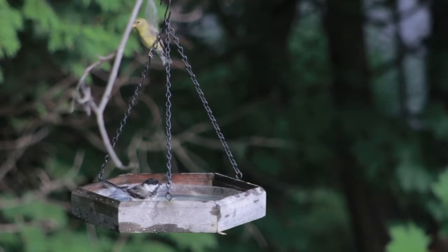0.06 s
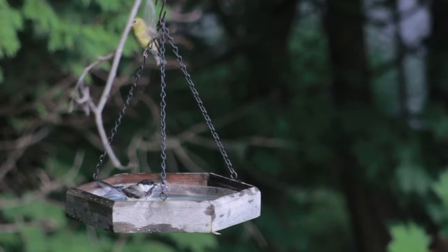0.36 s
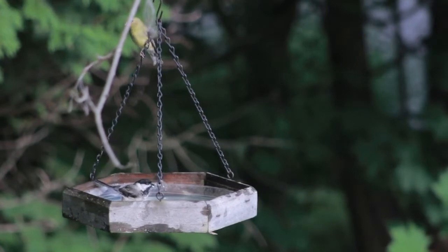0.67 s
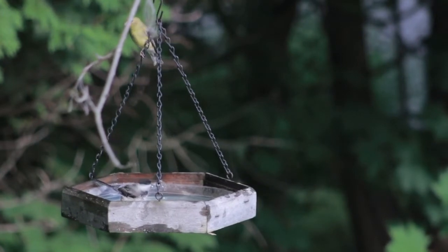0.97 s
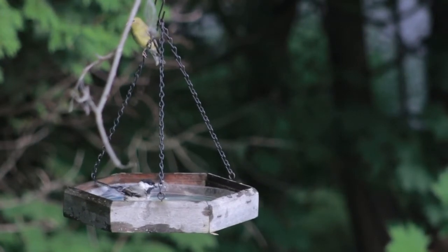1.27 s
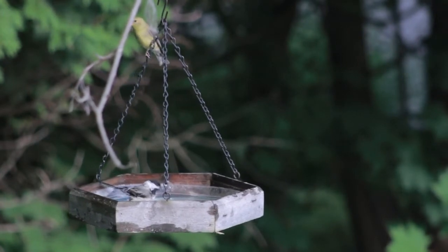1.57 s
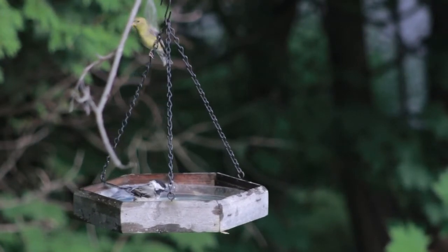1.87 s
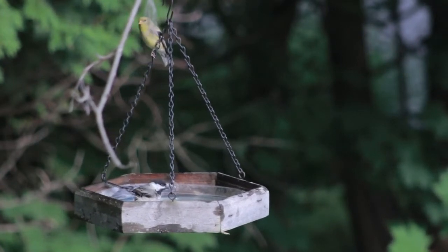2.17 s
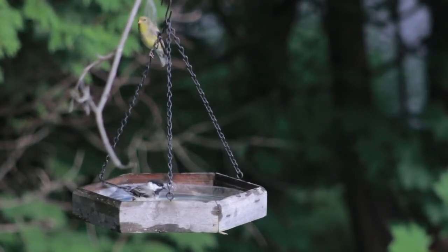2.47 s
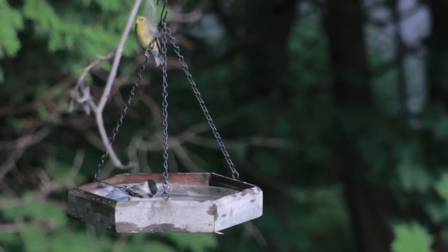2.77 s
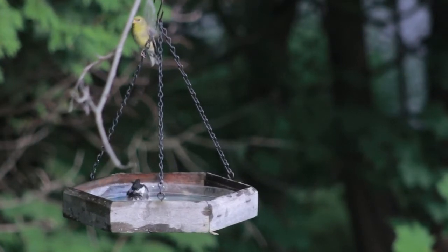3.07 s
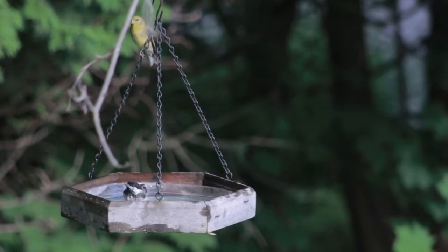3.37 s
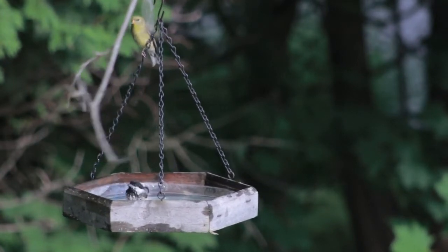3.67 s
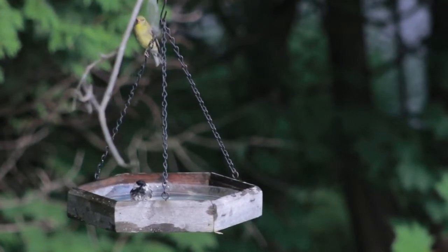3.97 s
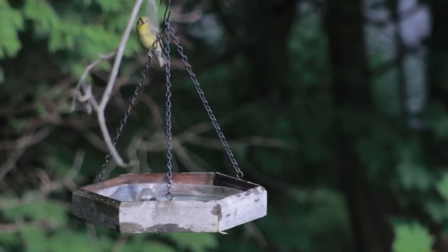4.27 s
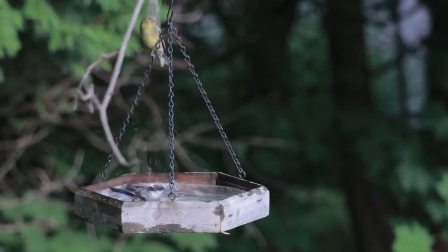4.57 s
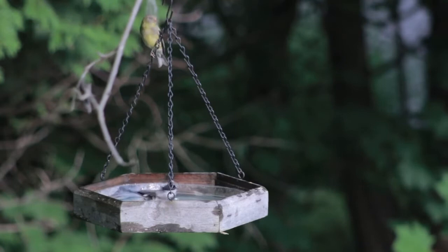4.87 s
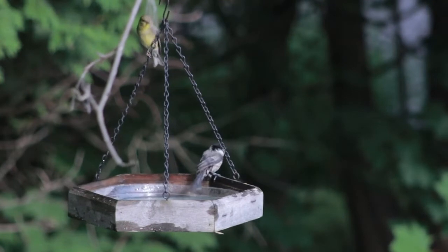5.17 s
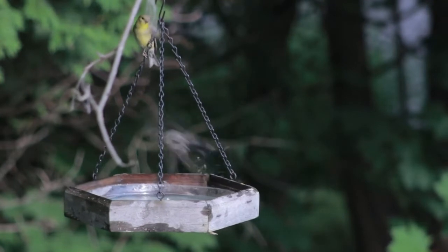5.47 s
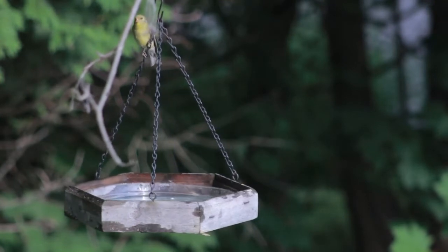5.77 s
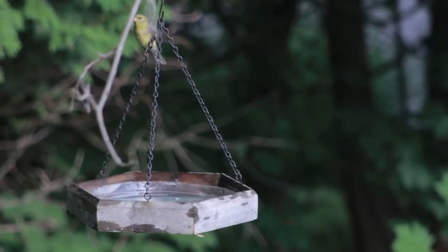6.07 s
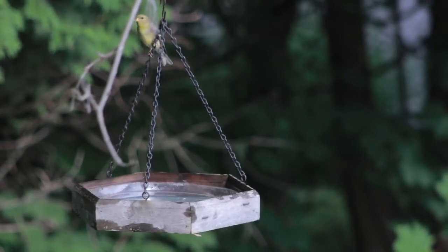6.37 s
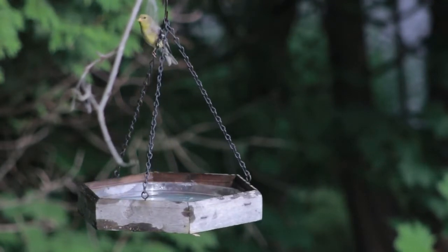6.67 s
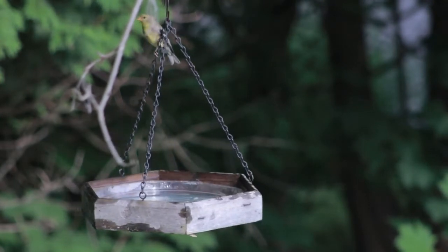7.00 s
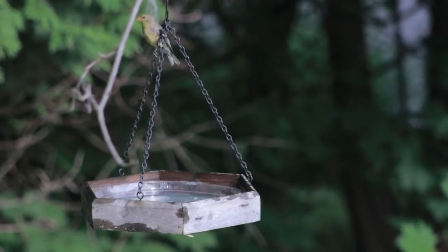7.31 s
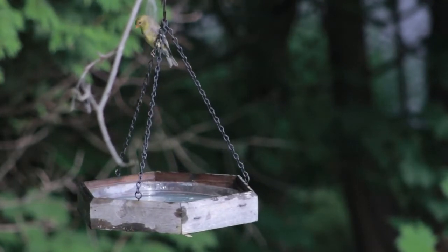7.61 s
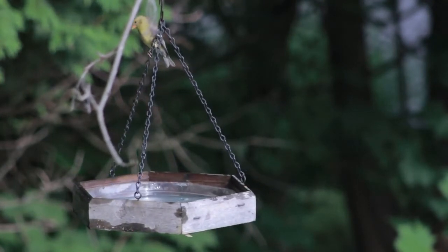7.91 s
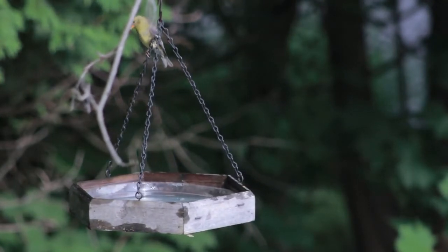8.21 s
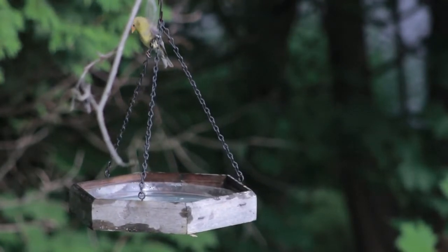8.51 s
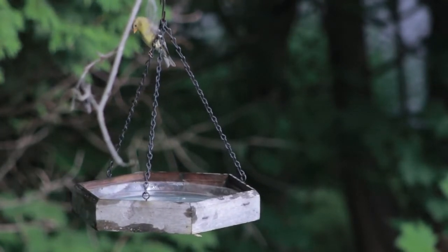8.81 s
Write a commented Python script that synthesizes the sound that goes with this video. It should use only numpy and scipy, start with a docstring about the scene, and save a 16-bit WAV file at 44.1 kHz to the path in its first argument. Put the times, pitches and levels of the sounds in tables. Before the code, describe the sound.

In a quiet wooded garden, quick clusters of slightly hoarse bird chirps come from the trees, with short pauses between them. A second small bird, nearer the microphone, slips in a few very high calls, while a cricket pulses softly all the way through. Underneath lie an even hiss and the low drone of far engines, rising briefly around the middle, with another engine faintly approaching at the end.

```python
"""Songbirds, cricket and a far road.

A songbird's syrinx whistles short slurred phrases from the trees round a bird bath, about one a second;
a small bird nearer by gives thin high calls. A cricket chirps steadily, rasping its wings.
Trunks and leaves scatter every note. Far behind the wood, two exhausts drone over tyre noise and hiss."""
import sys
import numpy as np
from scipy import signal
from scipy.fft import rfft, irfft
from scipy.io import wavfile

SR = 44100
rng = np.random.default_rng(int(sys.argv[2]) if len(sys.argv) > 2 else 0)


def materialize(psi):
    """Save the field psi as 16-bit PCM at rate SR to the path in sys.argv[1].

    A 1-D psi becomes a single channel; in a 2-D psi each row is a channel.
    """
    bounded = np.clip(np.atleast_2d(psi).T, -1, 1)
    quanta = np.round(bounded * 32767).astype(np.int16)
    wavfile.write(sys.argv[1], SR, quanta)


N = 390285
TIME_S = np.arange(N) / SR
FREQ_HZ = np.maximum(np.arange(N // 2 + 1) * SR / N, 1)

# songbird notes: (start [s], length [s], first pitch [Hz], middle pitch [Hz], last pitch [Hz],
# relative level [dB], accent position [0-1])
SONG_NOTES = [ (.136, 0.013, 3170, 3285, 3350, -36.5, 0.9), (.156, 0.053, 3300, 3850, 4140, -48, 0.4),
              (.238, 0.031, 2850, 2706, 3830, -37, 0.6), (.274, 0.055, 3550, 2750, 2555, -34.5, 0.02),
              (.682, 0.015, 4730, 3340, 2940, -56, 0.55), (1.155, 0.057, 3500, 3060, 3850, -55.5, .55),
              (1.294, 0.047, 2510, 3127, 3240, -37, 0.82), (1.340, 0.051, 3200, 2670, 2423, -33, 0.03),
              (1.398, 0.0096, 2520, 2740, 2800, -37.5, 0.4), (2.384, 0.063, 2720, 3450, 2910, -47.5, 0.26),
              (2.424, 0.029, 2650, 2364, 2825, -40.5, 1), (2.472, 0.017, 2330, 2310, 2480, -46, .6),
              (2.560, 0.032, 3480, 2760, 2500, -39, 0.36), (2.770, 0.04, 4950, 4750, 4300, -64, 0.6),
              (2.934, 0.032, 4500, 3650, 3050, -53.5, 0.8), (3.496, 0.039, 3530, 2993, 2910, -43, 0.47),
              (3.554, 0.022, 2570, 2840, 3820, -35.5, 0.83), (4.703, 0.012, 3150, 2950, 3100, -48, .5),
              (4.718, 0.042, 3310, 3550, 3030, -48.5, 0.5), (4.784, 0.032, 2710, 3290, 3960, -39.5, 0.22),
              (5.492, 0.027, 3200, 3590, 3400, -50.5, 0.65), (5.516, 0.038, 3400, 2390, 2420, -41, 0.07),
              (5.636, 0.046, 2590, 2747, 2690, -34.5, 0.67), (5.688, 0.038, 2700, 2695, 2600, -36.5, 0.5),
              (6.545, .050, 4900, 4230, 3640, -62, 0.95), (6.602, 0.044, 3050, 2720, 2880, -51.5, 0.02),
              (6.650, 0.038, 2890, 3630, 4530, -50.5, 0.33), (7.362, 0.047, 2670, 2710, 2920, -51, 0.4),
              (7.390, 0.0272, 3064, 2980, 2580, -35.5, 0.67), (7.420, 0.026, 2840, 2735, 2630, -34.5, 0.4),
              (7.444, 0.0617, 2680, 2444, 2403, -37, 0.06), (7.588, 0.0367, 2900, 2894, 2380, -46.5, 0.3),
              (7.638, 0.021, 2380, 2370, 2320, -49, 0.61), (8.400, 0.023, 5200, 4820, 4150, -47, 0.6),
              (8.424, 0.025, 4110, 3710, 3700, -50, 0.56), (8.465, 0.021, 2890, 2615, 2500, -54, 0.4),
              (8.506, 0.029, 2550, 2770, 3400, -47, 0.74), (8.545, 0.031, 4500, 3494, 2700, -37.5, 0.73), ]
# share of the song sent into the trees as the head turns: (time [s], gain [dB])
HEAD_TURN = [(.2, 0.5), (1.35, -0.5), (2.5, 0.5), (3.55, 3.5), (4.75, 3), (5.51, 8.5), (5.55, 1),
             (5.65, -0.5), (5.72, -12.5), (6.6, 4.5), (7.45, -3), (8.5, -1)]
# small bird's calls: columns as SONG_NOTES
CALL_NOTES = [ (3.551, .048, 5500, 5910, 3550, -36, 0.34), (4.721, 0.048, 6770, 7650, 7880, -34, 0.22),
              (6.058, 0.027, 6900, 7140, 7240, -42, .43), (6.262, 0.037, 6800, 7250, 7940, -33, 0.67),
              (6.289, .024, 7610, 7680, 6250, -34.5, 0.31), (7.075, 0.022, 7760, 7800, 6300, -61, .3),
              (7.530, 0.03, 7200, 7560, 8000, -52, .42), ]
# cricket chirps: (peak time [s], relative level [dB])
CRICKET_CHIRPS = [(.28, -52), (.66, -60), (1.03, -59.5), (1.33, -56), (1.65, -57.5), (1.91, -56.5),
                  (2.19, -56), (2.48, -52.5), (2.97, -55), (3.25, -58), (3.54, -52), (3.82, -54),
                  (4.08, -55), (4.36, -60), (4.61, -57), (4.86, -56.5), (5.14, -58.5), (5.41, -57),
                  (5.68, -58.5), (5.98, -63.5), (6.28, -58.5), (6.53, -61.5), (6.83, -58.5), (7.11, -63),
                  (7.42, -63.5), (7.69, -62), (7.92, -58), (8.18, -61.5), (8.49, -57), (8.78, -64)]
# far exhaust: (time [s], level [dB])
EXHAUST_LEVEL = [(0.0, -47.5), (0.29, -56.5), (0.39, -50), (0.67, -63), (0.71, -49.5), (1.01, -71),
                 (1.06, -56.5), (2.29, -75), (2.69, -55), (2.96, -69), (3.52, -44), (4.46, -47.5),
                 (4.68, -64.5), (6.16, -69.5), (7.22, -52.5), (7.64, -70.5), (7.84, -60.5), (8.85, -62.5)]
# far exhaust: (time [s], firing rate [Hz])
EXHAUST_FIRING = [(0, 108.6), (.7, 113), (1.2, 95.4), (3.0, 107.7), (4.5, 126.7), (5.6, 135.3),
                  (6.2, 108.1), (7.3, 108.4), (7.9, 95), (8.85, 108)]
# approaching engine: (time [s], firing rate [Hz], relative level [dB])
ENGINE_APPROACH = [(6.0, 74.93, -83), (7.2, 76.1, -78.5), (7.75, 78.3, -71.5), (8.0, 82.3, -64.5),
                   (8.3, 76.4, -74.5), (8.5, 72.4, -63), (8.62, 76.9, -63.5), (8.85, 81.9, -59.5)]
# its pipe resonances: (centre [Hz], width per stage [Hz], gain [dB])
PIPE_MODES = [(162, 165, 0.5), (476.5, 122, -0.5)]
# far traffic and hiss: (frequency [Hz], relative density [dB])
AIR_SPECTRUM = [(59, -28), (100, 0), (132, -14.5), (181, -7.5), (248, -8), (319, -13), (497, -13.5),
                (668, -16), (742, -13.5), (917, -15), (1090, -15), (1400, -22.5), (2810, -19.5),
                (4660, -20), (15500, -25)]
# their stereo width: (frequency [Hz], side minus mid [dB])
AIR_WIDTH = [(60, -19), (110, -16.5), (200, -20), (380, -13.5), (700, -13.5), (1290, -8), (2380, -5),
             (4400, -2), (8120, 0), (15000, 0.5)]
# far tyre noise: (time [s], relative level [dB])
TYRE_LEVEL = [(0.0, -63.5), (1.13, -67.5), (7.56, -69), (8.04, -65.5), (8.23, -69), (8.85, -67)]
# air moving past the microphone: (time [s], relative level [dB])
WIND_LEVEL = [(0.0, -68), (0.19, -57.5), (0.42, -73), (1.26, -68), (1.92, -73.5), (4.34, -71.5), (4.8, -72),
              (5.3, -71), (7.56, -76), (8.11, -58.5), (8.65, -73.5), (8.85, -54)]


def songbird(throat_hz=2000):
    """Song from up in the trees, rich in echoes; the small throat passes nothing low."""
    voice = undb(-4.5) * syrinx(SONG_NOTES, rise_db=16, fall_db=11, waver=0.026,
                                rasp_db=-20, rasp_hz=1140, octave_db=-32.5, edge_s=0.0013)
    voice = shape(voice, 1 / np.sqrt(1 + (throat_hz / FREQ_HZ) ** 14))
    return wood(voice, pan_db=-1, near_db=0.5, near_t60_s=0.23, far_db=-12.5, far_t60_s=0.64,
                width=0.2, send=undb(curve(HEAD_TURN)), flicker_hz=91)


def small_bird():
    """Closer, buzzy high calls that die fast among the leaves."""
    voice = undb(-8) * syrinx(CALL_NOTES, rise_db=12, fall_db=4, waver=0.013,
                              rasp_db=-16, rasp_hz=1300, octave_db=-38, edge_s=0.0041)
    return wood(voice, pan_db=0, near_db=-5, near_t60_s=0.11, far_db=-23, far_t60_s=0.4, width=0.43)


def syrinx(notes, rise_db, fall_db, waver, rasp_db, rasp_hz, octave_db, edge_s):
    """One pitch arc per note, swelling to its accent: an unsteady, hoarse near-sine with a faint octave."""
    out = np.zeros(N)
    drift = 1 + waver * walk(303)
    hoarse = 1 + undb(rasp_db) * (rasp(rasp_hz) + 1j * rasp(rasp_hz))
    for start_s, length_s, first_hz, middle_hz, last_hz, db, accent in notes:
        span = slice(int(start_s * SR), int((start_s + length_s) * SR))
        along = np.linspace(0, 1, span.stop - span.start)
        arc_hz = np.polyval(np.polyfit([0, .5, 1], [first_hz, middle_hz, last_hz], 2), along)
        phase = phase_rad(arc_hz * drift[span])
        swell_db = np.interp(along, [0, np.clip(accent, .05, .95), 1], [-rise_db, 0, -fall_db])
        to_edge_s = np.minimum(along, 1 - along) * length_s
        gate = np.sin(np.pi / 2 * np.clip(to_edge_s / edge_s, 0, 1)) ** 2
        tone = np.imag(hoarse[span] * np.exp(1j * phase)) + undb(octave_db) * np.sin(2 * phase)
        out[span] += np.sqrt(2) * gate * undb(db + swell_db) * tone
    return out


def cricket(tone_hz=5220, stroke_hz=53, swell_s=0.029, fade_s=0.019, sag_hz=130, wing_hz=5000):
    """Chirps are swelling runs of uneven wing strokes; each stroke sags in pitch, the file's teeth rasp."""
    out = np.zeros(N)
    teeth = undb(-14) * noise(np.abs(resonance(wing_hz, width_hz=1100)) ** 3)
    jitter_hz = 30 * walk(120)
    pace_hz = stroke_hz * (1 + .14 * walk(25))
    for peak_s, db in CRICKET_CHIRPS:
        offset, detune, *strengths = rng.standard_normal(18)
        span = slice(max(int((peak_s - .12) * SR), 0), int((peak_s + .08) * SR))
        t = TIME_S[span] - peak_s
        stroke, along = np.divmod(np.cumsum(pace_hz[span]) / SR + offset, 1)
        stroke_db = 1.8 * np.take(strengths, stroke.astype(int), mode="wrap")
        pulses = undb(stroke_db) * np.sin(np.pi * along) ** 2
        swell = np.exp(-np.abs(t / np.where(t < 0, swell_s, fade_s)) ** 1.54 / 2)
        pitch_hz = tone_hz + 18 * detune + sag_hz * (.5 - along) + jitter_hz[span]
        out[span] += 2 * undb(db) * swell * pulses * (np.sin(phase_rad(pitch_hz)) + teeth[span])
    return wood(undb(-1.2) * out, pan_db=-1.5, near_db=2, near_t60_s=0.15,
                far_db=-5.5, far_t60_s=0.23, width=0.22)


def wood(x, pan_db, near_db, near_t60_s, far_db, far_t60_s, width, send=1, flicker_hz=45):
    """Direct sound, separate echoes off near trunks, and a soft tail from the deep wood."""
    t = TIME_S[:SR]
    trunks = rng.standard_normal((2, SR)) * (rng.random(SR) < 2500 / SR)  # 2500 echoes/s
    trunks = trunks * (1 - np.exp(-t / 0.0013)) * undb(-60 * t / near_t60_s)
    tail = rng.standard_normal((2, SR)) * (1 - np.exp(-t / 0.032)) * undb(-60 * t / far_t60_s)
    mid, side = (undb(near_db) * unit(trunks) + undb(far_db) * unit(tail)) / np.sqrt(SR)
    echoes = signal.fftconvolve((x * send)[None], stereo(mid, width * side), axes=1)[:, :N]
    echoes *= unit(undb(1.8 * walk(flicker_hz)))  # flicker blurs their pitch
    return (x + echoes) * undb(np.array([[pan_db], [-pan_db]]) / 2)


def far_exhaust(blur_hz=24, rumble_hz=48):
    """Mainly the lowest note carries through the wood, over slight rumble; clear of its blur when loud."""
    level_db = curve(EXHAUST_LEVEL)
    phase = phase_rad(curve(EXHAUST_FIRING) * (1 + 0.012 * walk(21.4)))
    harmonics = np.sin(phase) + undb(-28.5) * np.sin(2 * phase) + undb(-33.5) * np.sin(3 * phase)
    tone = np.sqrt(2) * harmonics * undb(2 * walk(8.8))
    blur = rasp(blur_hz) * np.sin(phase) + rasp(blur_hz) * np.cos(phase)
    tone_share = np.clip((level_db + 61.5) / 18, .1, .82)
    rumble = undb(-21) * noise(resonance(rumble_hz, width_hz=53))
    mid = np.sqrt(tone_share) * tone + np.sqrt(1 - tone_share) * blur + rumble
    return stereo(undb(level_db) * mid, 0)


def approaching_engine():
    """Uneven firing harmonics and noise through two pipe resonances, far up the road."""
    phase = phase_rad(curve(ENGINE_APPROACH) * (1 + 0.0103 * walk(16.3)))
    firing = sum(np.sin(k * phase) * undb(4.7 * walk(11.5)) for k in range(1, 9))
    pipe = sum(undb(db) * resonance(hz, width_hz) ** 2 for hz, width_hz, db in PIPE_MODES)
    mid = unit(shape(firing, pipe)) + .45 * noise(pipe)
    return stereo(mid * undb(curve(ENGINE_APPROACH, column=2) + 2), 0)


def road_and_hiss(bed_db=-62.5, low_cut_hz=95, tyre_top_hz=1500):
    """Far tyres swell under an even hiss; narrow in the bass, wide in the treble."""
    spectrum = colour(AIR_SPECTRUM) / np.sqrt(1 + (low_cut_hz / FREQ_HZ) ** 8)
    bed = undb(bed_db) * stereo(noise(spectrum), shape(noise(spectrum), colour(AIR_WIDTH)))
    tyres = shape(bed, 1 / (1 + (FREQ_HZ / tyre_top_hz) ** 4))
    tyre_db = curve(TYRE_LEVEL)
    swell = undb(tyre_db - tyre_db.mean() + 1.45 + 1.2 * walk(3))
    return bed + tyres * (swell - 1)


def wind(low_cut_hz=9, top_hz=42):
    """Slow air rumbles past the microphone."""
    band = 1 / (1 + (FREQ_HZ / top_hz) ** 4) * FREQ_HZ / (FREQ_HZ + low_cut_hz)
    gusts = undb(curve(WIND_LEVEL) + 2.1 + 2.2 * walk(4.6))
    return gusts * stereo(noise(band), 0.3 * noise(band))


def undb(db):
    """Decibels to gain."""
    return 10 ** (np.asarray(db) / 20)


def unit(x):
    """Scale to rms 1."""
    return x / np.sqrt(np.mean(x ** 2))


def phase_rad(hz):
    """Running phase of a varying frequency."""
    return 2 * np.pi * np.cumsum(hz) / SR


def curve(rows, column=1):
    """Table column, linear in time."""
    rows = np.array(rows)
    return np.interp(TIME_S, rows[:, 0], rows[:, column])


def colour(points):
    """Gain per bin from (frequency [Hz], gain [dB])."""
    hz, db = np.transpose(points)
    return undb(np.interp(np.log(FREQ_HZ), np.log(hz), db))


def resonance(hz, width_hz):
    """Complex gain per bin of one resonance."""
    return 1 / (1 + 1j * hz / width_hz * (FREQ_HZ / hz - hz / FREQ_HZ))


def shape(x, gain):
    """Filter by a gain per bin."""
    return irfft(rfft(x) * gain, N)


def noise(gain):
    """Coloured noise, rms 1."""
    return unit(shape(rng.standard_normal(N), gain))


def walk(rate_hz):
    """Smooth random drift, rms 1."""
    return noise(np.exp(-(FREQ_HZ / rate_hz) ** 2))


def rasp(width_hz):
    """Random modulator that spreads a noise skirt round a tone."""
    return noise(1 / (1 + (FREQ_HZ / width_hz) ** 3))


def stereo(mid, side):
    """Mid/side to left/right."""
    return np.array([mid + side, mid - side])


def scene():
    """Birds and cricket over the distant road."""
    animals = songbird() + small_bird() + cricket()
    return animals + far_exhaust() + approaching_engine() + road_and_hiss() + wind()


def record(dry, top_hz=15850):
    """Steep low-pass."""
    return signal.sosfilt(signal.ellip(10, .1, 70, top_hz, fs=SR, output="sos"), dry)


dry = scene()
out = record(dry)
materialize(out)
```